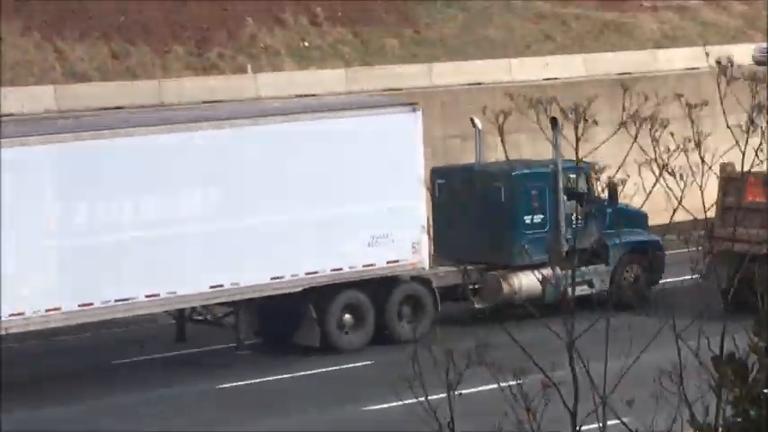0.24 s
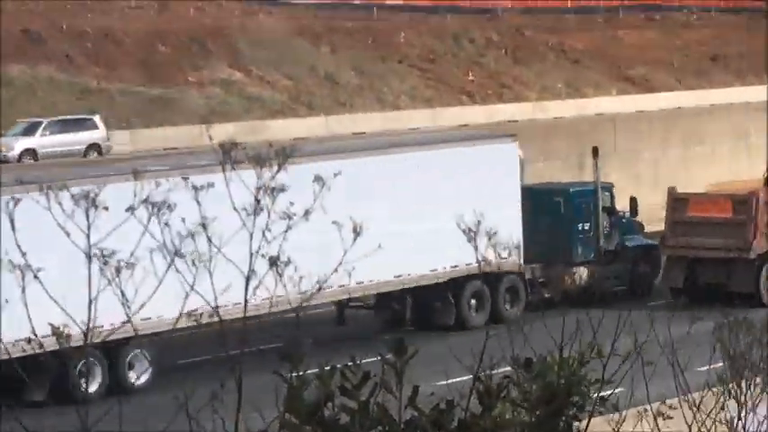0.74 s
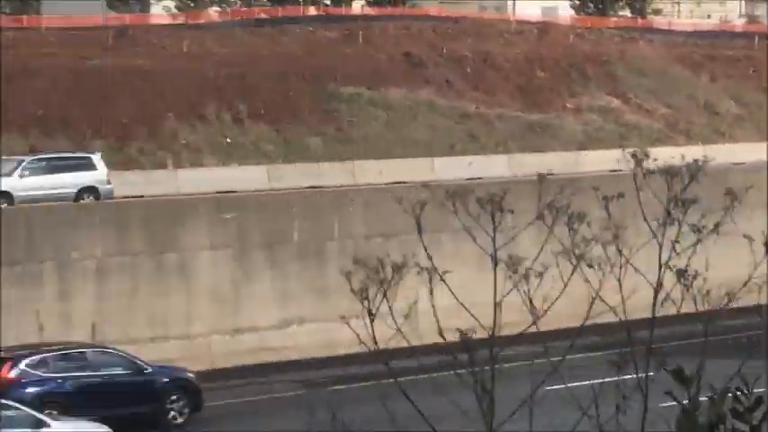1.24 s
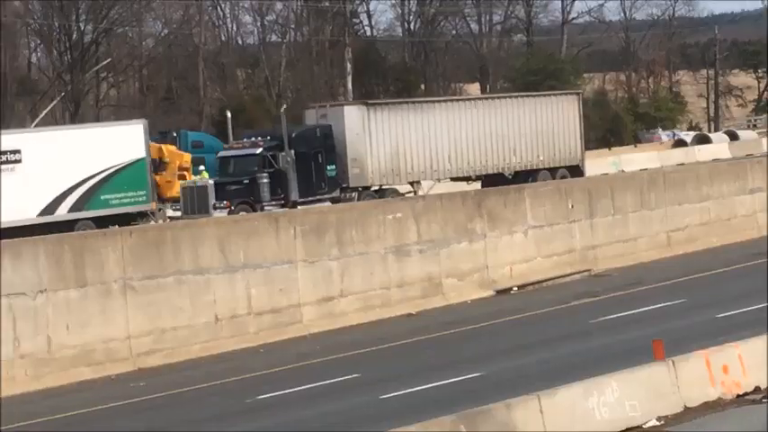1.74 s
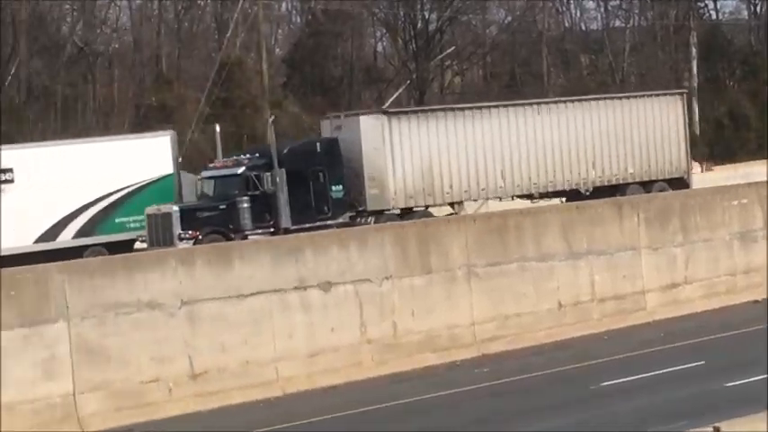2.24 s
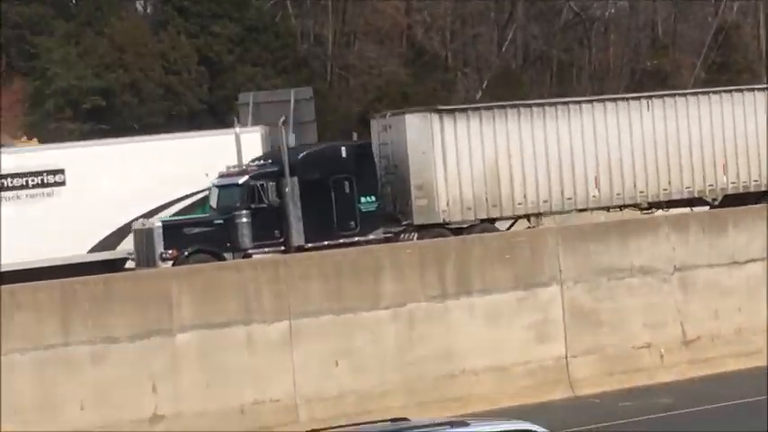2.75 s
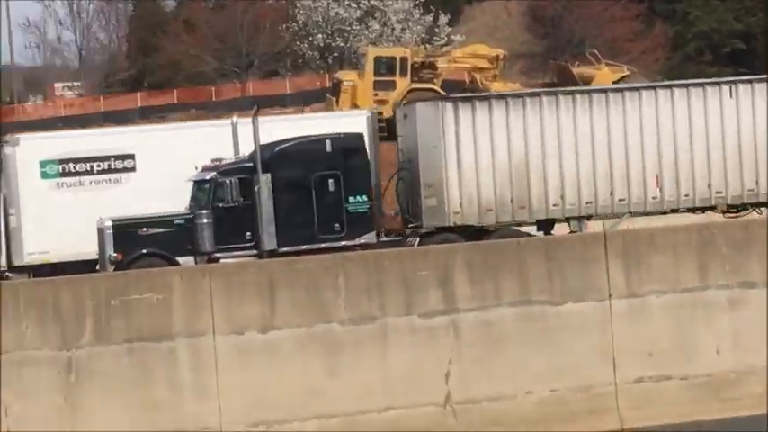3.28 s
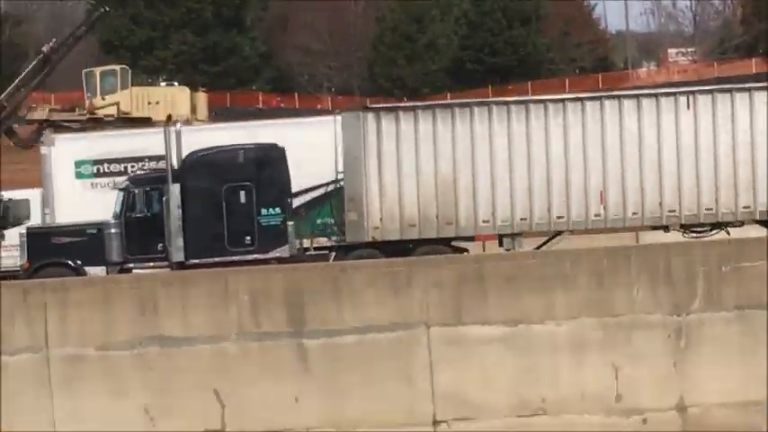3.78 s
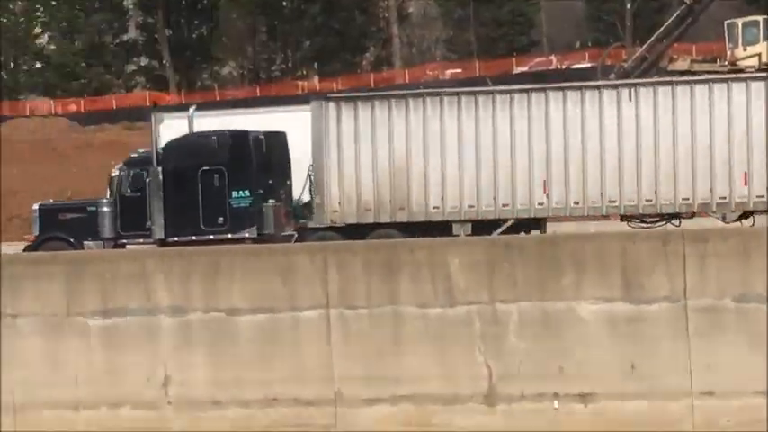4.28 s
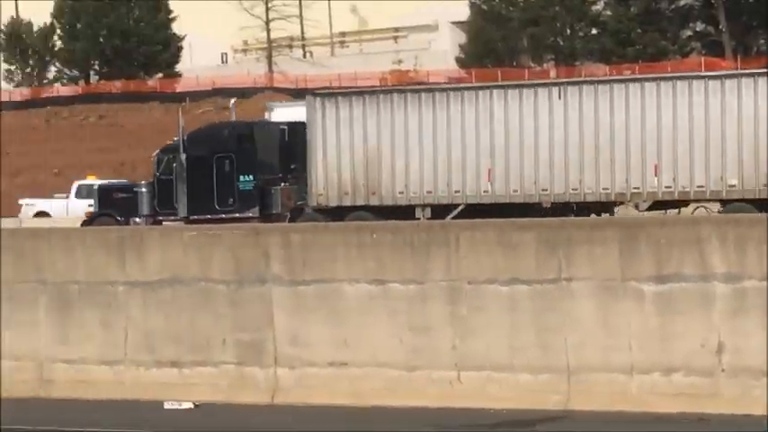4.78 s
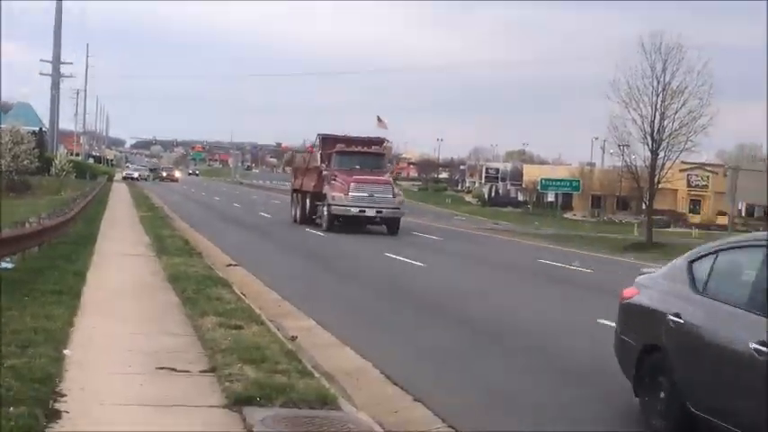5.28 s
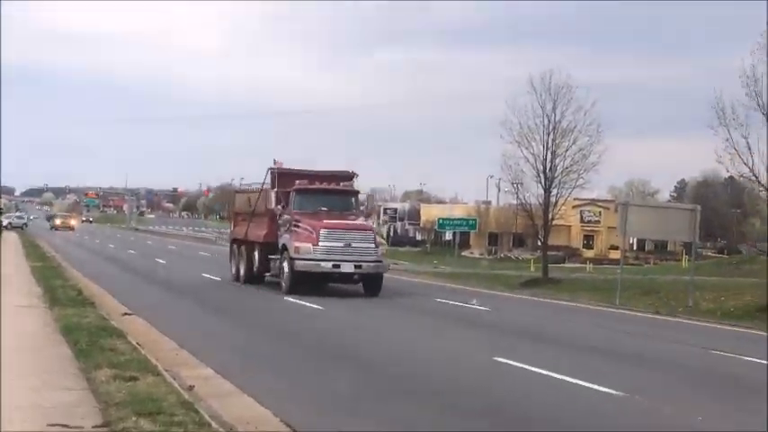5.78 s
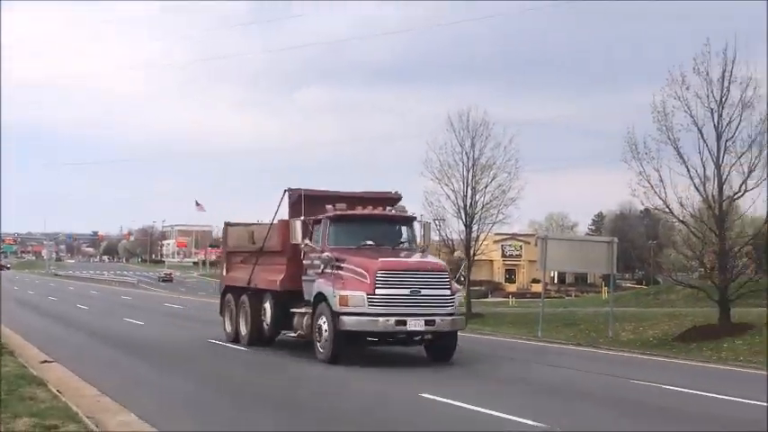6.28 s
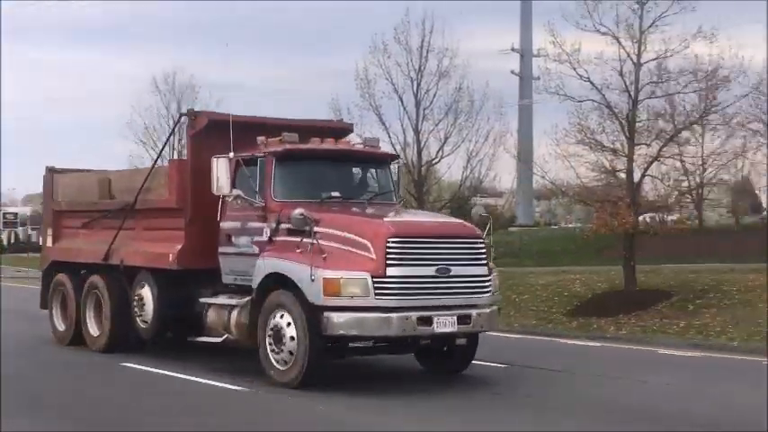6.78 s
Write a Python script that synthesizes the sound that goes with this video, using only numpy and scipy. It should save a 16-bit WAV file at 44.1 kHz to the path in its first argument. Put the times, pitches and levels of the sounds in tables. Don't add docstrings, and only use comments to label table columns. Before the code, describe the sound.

From 0 to 1.3 s a diesel tractor drones steadily, close by, with broad tyre roar and a thin, breathy turbo whistle rising high; a faint tick near 0.9. A tiny silent gap, then at 1.4 a cut to boomier, fuller highway roar. Low axle thumps land, strongest around 1.7 and 2.1, while a distant engine hums. From 2.45 to 3.3 a loose metal panel rattles in rapid, dry crackling bursts, about eleven per second, growing harder. More soft thumps follow, and a car hums in by 4.7. At 4.9 another cut: a dump truck's low growl nears, tyre slaps thud at 5.1-5.7, and tiny high squeaks chatter from 5.75 to 6.2. At 6.65 a loud, brassy, buzzing two-note air horn blasts, dips, and blasts again at 6.78, ducking the road and stopping around 6.9. Treble drops out momentarily throughout.

```python
import sys
import numpy as np
from scipy import signal
from scipy.fft import rfft, irfft, next_fast_len
from scipy.io import wavfile
from scipy.ndimage import uniform_filter1d, map_coordinates

SR = 44100
rng = np.random.default_rng(int(sys.argv[2]) if len(sys.argv) > 2 else 0)


def dump_mix(stems):
    frames = np.atleast_2d(stems).T
    limited = np.clip(frames, -1, 1)
    pcm = np.round(limited * 32767).astype(np.int16)
    wavfile.write(sys.argv[1], SR, pcm)


def undo_db(level):
    steps = np.asarray(level, float) / 20
    return 10 ** steps


N = 310015
T = np.arange(N) / SR

# (start [s], end [s])
PLACES = [
    (0, 1.342),
    (1.385, 4.915),
    (4.915, 7.03),
]
# (frequency [Hz], density [dB/Hz])
COLOURS = [
    [(15, -52), (25, -21), (55, -5), (75, -5.5), (129, -16.5), (331, -18), (369, -12), (510, -17),
     (567, -10.5), (784, -15.5), (1460, -24.5), (2630, -38.5), (4270, -35.5), (9320, -45.5), (15600, -53)],
    [(15, -45), (25, -6.5), (70, 4), (188, -9), (233, -3.5), (274, -8.5), (322, -7.5), (400, -10.5),
     (496, -4), (805, -1), (1810, -14.5), (2240, -20.5), (3180, -23), (7120, -40), (15600, -48.5)],
    [(15, -35), (25, -5), (43, -5.5), (99, -7), (221, -14), (340, -22.5), (445, -29), (523, -29),
     (583, -28.5), (800, -28), (1050, -21.5), (1580, -26.5), (3090, -33), (7930, -37.5), (15600, -42)],
]
# (time [s], firing rate [Hz], first order level [dB])
TRACTOR = [(0, 72.5, -18.5), (.14, 71.5, -30), (.25, 72.7, -17.5), (.59, 71.7, -13.5), (.625, 71.13, -26),
           (.85, 72.25, -27.5), (.95, 71.7, -15), (1.18, 70.2, -17), (1.24, 71.1, -27), (1.34, 70.6, -25)]
FAR_TRUCK = [(1.4, 75.3, -25), (1.73, 74.6, -41), (1.98, 82.7, -30), (2.09, 82.8, -20.5),
             (2.56, 84.1, -37.5), (2.77, 82.5, -27.5), (3.1, 80, -47), (3.79, 83.2, -41), (3.9, 82.3, -59)]
CAR = [(4.3, 62.36, -42), (4.68, 60.4, -24.5), (4.89, 61.6, -21.5), (4.91, 62.3, -40)]
DUMP = [(4.92, 50.53, -27.5), (5.6, 50.18, -28.5), (5.85, 50.26, -23), (6.06, 48.5, -23), (6.52, 48, -20),
        (6.92, 47.1, -18), (7.03, 47.3, -17)]
# (frequency [Hz], gain [dB])
STACK = [(25, -40), (100, -51), (150, 10), (300, 0), (600, -16), (1500, -22), (4000, -34), (9000, -110)]
# (time [s], pitch [Hz], level [dB])
TURBO = [(0, 7300, -48), (.25, 8200, -46), (.45, 8750, -49), (.7, 8950, -51), (1.1, 9150, -49),
         (1.33, 9300, -46), (1.39, 9450, -59), (1.6, 9350, -59), (1.76, 8900, -59), (2.0, 7680, -60),
         (2.17, 7000, -65), (2.3, 6700, -80)]
# (time [s], crack level [dB], push level [dB])
CRACKS = [(2.4697, -24, -23), (2.5413, -26, -15), (2.5487, -29, -13), (2.5553, -24, -20),
          (2.5995, -35, -15), (2.6292, -17, -19), (2.6355, -24, -15), (2.6396, -26, -16),
          (2.6437, -23, -11), (2.6501, -28, -15), (2.7122, -29, -15), (2.7246, -25, -11), (2.731, -22, -19),
          (2.8002, -26, -24), (2.8049, -27, -12), (2.8092, -31, -16), (2.8254, -30, -14),
          (2.9015, -25, -14), (2.9082, -27, -18), (2.9113, -23, -21), (2.937, -34, -17), (2.9794, -29, -14),
          (2.9823, -23, -19), (2.9908, -25, -13), (3.0, -18, -14), (3.0509, -32, -15), (3.0668, -23, -20),
          (3.0723, -23, -12), (3.0804, -22, -10), (3.0886, -13, -10), (3.0928, -20, -14),
          (3.1568, -21, -12), (3.1624, -23, -13), (3.1706, -22, -12), (3.1775, -20, -21),
          (3.1828, -27, -17), (3.1893, -25, -21), (3.2476, -19, -11), (3.253, -24, -11), (3.2616, -21, -13),
          (3.2661, -23, -17), (3.2702, -27, -18)]
# (frequency [Hz], density [dB/Hz])
PANEL = [(1180, -5), (2000, -4), (2400, -11), (2900, -11), (3800, -4.5), (5000, -10), (6500, -16),
         (10300, -33), (15000, -42)]
SHAKE_DB = [-34, -33, -32, -32, -33, -33, -31, -29, -28, -30]
# (time [s], peak [dB], pitch [Hz])
SQUEAKS = [(5.7508, -29, 7170), (5.8017, -31, 7420), (5.8275, -24, 7180), (5.8501, -24, 7070),
           (5.8731, -26, 7250), (5.9269, -29, 7310), (5.9454, -30, 6960), (5.9653, -28, 7070),
           (5.9918, -29, 6610), (6.0102, -27, 6770), (6.0327, -29, 7170), (6.0571, -30, 7040),
           (6.0714, -32, 6590), (6.0931, -23, 6640), (6.1164, -27, 6780), (6.1354, -28, 6920),
           (6.1544, -32, 6980), (6.2113, -31, 6660)]
# (time [s], peak [dB], pitch [Hz], knock re peak [dB])
THUMPS = [(1.42, -15, 76, -12), (1.518, -22, 76, -2), (1.599, -15, 78, -4), (1.67, -22, 76, -6),
          (1.734, -5.5, 74, -7), (2.078, -9, 83, -17), (2.31, -18, 76, -18), (2.5, -18, 70, -12),
          (2.63, -18, 76, -10), (3.33, -19, 70, -15), (3.52, -15, 55, -24), (3.632, -17, 70, -18),
          (3.68, -13, 79.3, -15), (3.76, -20, 83, -4), (4.476, -19, 70, -18), (4.632, -17, 70, -18)]
# (time [s], level [dB], centre [Hz], width [Hz])
TICKS = [
    (.915, -35.5, 6530, 598),
    (2.352, -48, 11870, 4000),
    (3.829, -51, 9050, 5000),
]
# (time [s], peak [dB], pitch [Hz])
FLAT_SPOT = [(5.083, -21, 127), (5.188, -21, 143), (5.299, -20, 137), (5.401, -16, 140), (5.509, -15, 137),
             (5.606, -16, 137), (5.66, -15, 118), (5.709, -17, 102)]
# (early level [dB], late level [dB])
HIGH_BELL = [(-3, -6.5), (-0.5, 3.5), (2.5, -2.5), (-2, -13), (-3, 1), (-2, -6.5), (-23, -3), (-9.5, -14),
             (-13, -13), (-13, -13), (-21, -21), (-20.5, -21), (-24, -17), (-6.5, -9.5), (-17, -19),
             (-15, -22), (-25, -34), (-17, -14), (-27, -24), (-15, -19), (-16, -16), (-17, -20), (-20, -13),
             (-12.5, -13), (-21, -10), (-14, -13), (-11, -14), (-14, -14), (-15, -17), (-15, -11),
             (-35, -30), (-22, -24), (-18, -17), (-33, -22), (-15, -15), (-29, -17), (-21, -20), (-15, -11),
             (-22, -24), (-26, -24)]
LOW_BELL = [(-3.5, -1.5), (-15, -6), (2, 2), (-2, -9), (-12, -4), (-1, 3), (3.5, -1), (-6, -8), (-15, 0.5),
            (-8, -14), (-14, -11), (-22, -11), (-7, -8), (-9, -12), (-23, -13), (-22, -16), (-26, -20),
            (-12, -13), (-10, -1), (-12, -16), (-4, -4.5), (-22, -16), (-22, -18), (-22, -16), (-19, -24),
            (-16, -23), (-11, -12), (-12, -19), (-17, -19), (-25, -32), (-13, -21), (-11, -11), (-12, -9),
            (-28, -9), (-20, -7), (-21, -3), (-14, -6), (-7, -5), (-16, -17), (-11, -8), (-19, -23),
            (-26, -14), (-25, -31), (-25, -22), (-10, -14), (-6, -24), (-21, -17), (-20, -9), (-16, -13),
            (-22, -15), (-11, -11), (-21, -19), (-21, -18), (-25, -22)]
# (frequency [Hz], density [dB/Hz])
BUZZ = [(2240, -30), (4000, -16), (7000, -15), (10300, -11), (11500, -8), (13500, -11), (15600, -13)]
# (full [s], release [s], level [dB])
BLASTS = [
    (6.657, 6.716, 0),
    (6.78, 6.859, -3),
]
# (rest pitch [Hz], sharpening in slack air [0-1])
TRUMPETS = [
    (258.1, .013),
    (192.5, .009),
]
# (time [s], re usual level [dB])
TRACTOR_NEAR = [(0, 1.5), (.25, 1), (.55, -0.5), (.8, 1), (1.1, -4), (1.34, -1)]
FAR_LANES = [(1.4, 2.4), (1.8, 0.45), (2.3, -0.44), (2.65, 1.5), (3.2, 0.71), (3.5, -0.68), (3.8, -1),
             (4.15, -1), (4.4, 0), (4.7, -0.88), (4.9, 1.1)]
CAR_NEAR = [(4.92, -2), (5.1, -0.5), (5.55, -3.5), (5.8, -5), (6.3, -14)]
DUMP_NEAR = [(4.92, -14.5), (5.2, -10), (5.4, -5), (5.75, -4), (6.05, -4.5), (6.6, 0.5)]
HORN_AIR = [(6.62, -34), (6.66, 4), (6.74, 0), (6.8, -10), (6.86, -3), (6.92, -26)]
# (nearness, usual levels of rumble, body, roar, hiss [dB], their follow factors [dB/dB])
ROAD = [
    [(TRACTOR_NEAR, (-21, -26.5, -21.5, -34.5), (0.55, 1.4, 0.3, 0.62))],
    [(FAR_LANES, (-29, -33, -29, -43.5), (1.8, 0.56, 0.58, 0.63))],
    [(CAR_NEAR, (-28, -50, -27, -44.5), (0.43, .9, 0.94, .9)), (DUMP_NEAR, (-20.5, -28.5, -36, -32.5),
     (1, 1.0, 1.4, 1.47)), (HORN_AIR, (-60, -60, -21, -20), (.9, .9, 0.88, 0.68))],
]
# (centre [Hz], width [Hz], depth [0-1])
MIC_DIPS = [(4900, 360, 0.29), (10470, 270, 0.4)]
# (time [s], lowest frequency [Hz], share of lines kept [0-1])
DROPOUTS = [(.835, 2500, .05), (.894, 2500, .03), (1.001, 3000, .06), (1.533, 4000, .03), (2.09, 4000, .06),
            (3.179, 5300, .02), (4.905, 3000, .01), (5.183, 3000, .03), (5.401, 3000, .012),
            (5.448, 4400, .006), (5.567, 3500, .04), (5.634, 2800, .06), (5.801, 2500, .06),
            (5.909, 3000, .05), (6.057, 2500, .07), (6.1, 2500, .06), (6.185, 2000, .02), (6.74, 2800, .11)]


def unit(x):
    return x / np.sqrt(np.mean(x ** 2) + 1e-20)


def along(points, hz):
    f, v = np.transpose(points)
    return np.interp(np.log(hz + 1), np.log(f + 1), v)


def curves(rows):
    s, *cols = np.transpose(rows)
    return [np.interp(T, s, c) for c in cols]


def during(start_s, end_s, fade_s=0.00047):
    return np.clip(np.minimum(T - start_s, end_s - T) / fade_s, 0, 1)


def wobble(rate_hz):
    return map_coordinates(rng.standard_normal(int(N * rate_hz / SR) + 4), [T * rate_hz])


def filtered(x, response):
    m = next_fast_len(len(x) + 8192)
    return irfft(rfft(x, m) * response(np.fft.rfftfreq(m, 1 / SR)), m)[:len(x)]


def above(hz, edge_hz):
    return 1 / (1 + (edge_hz / (hz + 1)) ** 6)


def ring(start_s, db, hz, t60_s, attack_s):
    t = np.clip(T - start_s, 0, None)
    return undo_db(db - 60 * t / t60_s) * np.sin(2 * np.pi * hz * t) * (1 - np.exp(-t / attack_s))


def power_sum(levels_db):
    return np.sqrt(sum(undo_db(db) ** 2 for db in levels_db))


def rush(spectrum, patchy_db):
    z = signal.stft(rng.standard_normal(N), nperseg=512)[2]
    field = uniform_filter1d(rng.standard_normal(z.shape), size=5, axis=0)
    field = uniform_filter1d(field, size=10, axis=1)
    noise = signal.istft(z * undo_db(patchy_db * unit(field)), nperseg=512)[1][:N]
    return filtered(noise, lambda hz: undo_db(along(spectrum, hz)))


def traffic():
    out = np.zeros(N)
    for place, sources, colour in zip(PLACES, ROAD, COLOURS):
        noise = rush(colour, patchy_db=1.38)
        over = [noise]
        for edge_hz in (310, 980, 2800):
            over.append(filtered(noise, lambda hz: above(hz, edge_hz)))
        over.append(0)
        for k, swell_db in enumerate([1.0, 0.55, 0.2, 0.13]):
            gain = power_sum(usual[k] + follows[k] * curves(near)[0] for near, usual, follows in sources)
            band = unit(over[k] - over[k + 1])
            out += during(*place) * gain * undo_db(swell_db * wobble(rate_hz=18)) * band
    return out


def engine(rows, second_span_db, bark_db, uneven_db=3):
    hz, first_db = curves(rows)
    start_s, end_s = rows[0][0], rows[-1][0]
    second_db = np.interp(T, [start_s, end_s], second_span_db) + 1.5 * wobble(rate_hz=8)
    turns = np.cumsum(hz * (1 + 0.00616 * wobble(rate_hz=9))) / SR
    drone = undo_db(first_db) * np.sin(2 * np.pi * turns) + undo_db(second_db) * np.sin(4 * np.pi * turns + 1)
    firing = np.flatnonzero(np.diff(np.floor(turns)))
    cylinder_db = rng.normal(0, uneven_db, size=6)[np.arange(len(firing)) % 6]
    pulses = np.zeros(N)
    pulses[firing] = undo_db(cylinder_db + uneven_db * rng.standard_normal(len(firing)))
    bark = unit(filtered(pulses, lambda f: undo_db(along(STACK, f)) * np.exp(-1j * np.sqrt(f / 60))))
    rasp = filtered(rng.standard_normal(N), lambda f: above(f, edge_hz=340) * (1 - above(f, edge_hz=1500)))
    bark += 2 * unit(rasp) * np.exp(-5 * (turns % 1))
    smooth_db = uniform_filter1d(first_db, size=SR // 4)
    return during(start_s, end_s, fade_s=0.00081) * (np.sqrt(2) * drone + undo_db(smooth_db + bark_db) * bark)


def engines():
    near = engine(TRACTOR, (-33, -39), bark_db=-14.5) + engine(DUMP, (-42, -17), bark_db=-10.5, uneven_db=0.0)
    far = engine(FAR_TRUCK, (-41, -50), bark_db=-33.0) + engine(CAR, (-45, -30), bark_db=-11.5)
    return near + far


def whistle(rows, width_hz):
    hz, db = curves(rows)
    phase = 2 * np.pi * np.cumsum(hz) / SR
    blurred = wobble(width_hz) * np.sin(phase) + wobble(width_hz) * np.cos(phase)
    return during(rows[0][0], rows[-1][0]) * undo_db(db + 1.4 * wobble(rate_hz=43)) * blurred


def glide(start_s, end_s, first_hz, last_hz, db, width_hz):
    s = np.array([start_s, start_s + .08, end_s - .08, end_s])
    hz = np.interp(s, [start_s, end_s], [first_hz, last_hz])
    return whistle(list(zip(s, hz, db - 18 * np.array([1, 0, 0, 1]))), width_hz)


def turbos():
    return whistle(TURBO, width_hz=380) + glide(.36, 1.07, 9200, 10250, db=-50, width_hz=500)


def steady_tones():
    out = during(*PLACES[0]) * glide(.45, 1.43, 578, 556, db=-30, width_hz=25)
    out += glide(2.38, 2.63, 275, 271, db=-32, width_hz=15)
    out += glide(2.8, 3.0, 288, 290, db=-40, width_hz=15)
    out += glide(5.1, 5.75, 147, 138, db=-35, width_hz=20)
    out += glide(5.7, 6.21, 7350, 6700, db=-49, width_hz=600)
    return out + glide(6.22, 6.66, 782, 775, db=-41, width_hz=12)


def ticks():
    out = np.zeros(N)
    for s, db, hz, width_hz in TICKS:
        noise = filtered(rng.standard_normal(N), lambda f: np.exp(-((f - hz) / width_hz) ** 2))
        out += undo_db(db) * during(s - .012, s + 0.013, fade_s=0.0062) * unit(noise)
    return out


def thumps():
    out = np.zeros(N)
    for s, db, hz, knock_db in THUMPS:
        out += ring(s, db + 3.5, hz, t60_s=.092, attack_s=0.0053)
        out += ring(s, db + knock_db + 9, 2.59 * hz, t60_s=.046, attack_s=0.0025)
        out += ring(s, db + knock_db - 1.5, 5 * hz, t60_s=.046 * 0.67, attack_s=0.0013)
    return out


def rattle():
    first_s, turn_s, length_s, t60_s = 2.449, .0886, .022, .12
    grains = rng.standard_normal(N) * undo_db(3 * wobble(rate_hz=500))
    high = unit(filtered(grains, lambda hz: undo_db(along(PANEL, hz))))
    low = unit(filtered(grains, lambda hz: above(hz, edge_hz=190) * (1 - above(hz, edge_hz=1500))))
    out = np.zeros(N)
    for turn, db in enumerate(SHAKE_DB):
        s = first_s + turn_s * turn
        decay = undo_db(-60 * np.clip(T - s - length_s, 0, None) / t60_s)
        out += during(s, T[-1], fade_s=.003) * decay * (undo_db(db) * high + undo_db(-33) * low)
    for s, db, push_db in CRACKS:
        hz = 3450 * (1 + .15 * rng.uniform(-0.81, 1))
        out += ring(s, db + 5, hz, t60_s=.004, attack_s=.0001)
        out += ring(s, db, 1.45 * hz, t60_s=.003, attack_s=.0001)
        out += ring(s, db - 7, 2.4 * hz, t60_s=.0025, attack_s=.00005)
        out -= ring(s, push_db + 2.5, 1150, t60_s=.005, attack_s=.00008)
    return out


def flat_spot():
    return sum(ring(s, db + 3.5, hz, t60_s=0.073, attack_s=.006) for s, db, hz in FLAT_SPOT)


def squeaks():
    out = np.zeros(N)
    for s, db, hz in SQUEAKS:
        out += ring(s, db + 1, 1.01 * hz, t60_s=0.03, attack_s=0.002)
        out += ring(s + 0.0012, db - 1, rng.uniform(.93, 1.04) * hz, t60_s=0.025, attack_s=0.002)
    return out * (1 + .6 * wobble(rate_hz=600))


def valve(db, lead_s, rise_db_per_s, sag_db_per_s, fall_db_per_s):
    pulls = []
    for full_s, release_s, pull_db in BLASTS:
        rise = rise_db_per_s * np.clip(T - full_s + lead_s, None, 0)
        sag = sag_db_per_s * np.clip(T - full_s, 0, None)
        fall = fall_db_per_s * np.clip(T - release_s, 0, None)
        pulls.append(db + pull_db + rise - sag - fall)
    return np.max(pulls, axis=0)


def horn():
    start_s, end_s, full_buzz_db = 6.62, 6.935, -19.5
    high_db = valve(-9, lead_s=.022, rise_db_per_s=1800, sag_db_per_s=15, fall_db_per_s=420)
    low_db = valve(-12.5, lead_s=.008, rise_db_per_s=900, sag_db_per_s=35, fall_db_per_s=520)
    buzz_db = valve(full_buzz_db, lead_s=.007, rise_db_per_s=600, sag_db_per_s=60, fall_db_per_s=800)
    between = (T > BLASTS[0][1]) & (T < BLASTS[1][0])
    high_db = np.where(between, np.maximum(high_db, -8.5), high_db)
    out, slaps = np.zeros(N), np.zeros(N)
    on = slice(int(start_s * SR), N)
    late = np.clip((T[on] - 6.715) / 0.081, 0, 1)
    slack = uniform_filter1d(np.clip((full_buzz_db - buzz_db) / 20, 0, 1), size=int(.03 * SR))
    slack = np.roll(slack, int(.01 * SR))
    dulling_db = np.clip(buzz_db[on] - full_buzz_db + 4, -40, 0)
    voices = zip(TRUMPETS, (high_db, low_db), (HIGH_BELL, LOW_BELL), (0, -3))
    for (rest_hz, sharp), db, bell, slap_db in voices:
        hz = rest_hz * (1 + sharp * slack)
        phase = 2 * np.pi * np.cumsum(hz * (1 + .0005 * wobble(rate_hz=40)))[on] / SR
        for k, (early_db, late_db) in enumerate(bell, start=1):
            bell_db = early_db + late * (late_db - early_db)
            level_db = db[on] - 5.5 + 0.025 * k * dulling_db + bell_db + 2.6 * wobble(rate_hz=55)[on]
            out[on] += undo_db(level_db) * np.sin(k * phase + rng.uniform(0, 2 * np.pi))
        for k in range(len(bell) + 1, int(15700 / hz.max())):
            early_db, late_db = rng.normal(0, 3.4, size=2)
            level_db = slap_db + early_db + late * (late_db - early_db)
            slaps[on] += undo_db(level_db) * np.sin(k * phase + rng.uniform(0, 2 * np.pi))
    air = undo_db(-14) * np.std(slaps[on]) * rng.standard_normal(N)
    buzz = filtered(slaps + air, lambda f: undo_db(along(BUZZ, f)))
    return during(start_s, end_s) * (out + undo_db(buzz_db) * buzz / np.std(buzz[on]))


def scene():
    road = traffic() + engines() + turbos() + steady_tones()
    road += ticks() + thumps() + rattle() + flat_spot() + squeaks()
    duck = undo_db(-8.5 * np.clip((T - 6.63) / .07, 0, 1))
    return (duck * road + horn())[None]


def thin_treble(x):
    hz = np.fft.rfftfreq(2048, 1 / SR)
    for s, low_hz, kept in DROPOUTS:
        frame = slice(round(s * SR) - 1024, round(s * SR) + 1024)
        lines = rfft(x[frame])
        half_s = .022 if s == 5.448 else .011
        strength = np.abs(lines) * hz ** .25
        treble = hz > low_hz
        weak = strength < np.quantile(strength[treble], 1 - kept)
        weak_loss = 1 if kept < .015 else .91
        lost = treble * np.where(weak, weak_loss, -.3)
        x[frame] -= during(s - half_s, s + half_s, fade_s=.007)[frame] * irfft(lines * lost)
    return x


def band_limit(x):
    return signal.sosfilt(signal.butter(12, 15700, fs=SR, output="sos"), x)


def record(dry):
    x = filtered(dry[0], lambda hz: above(hz, edge_hz=32.4) ** 2)
    x = filtered(x, lambda hz: 1 - sum(depth * np.exp(-((hz - c) / w) ** 2) for c, w, depth in MIC_DIPS))
    x *= 1 - during(PLACES[0][1], PLACES[1][0])
    x = x / (1 + np.abs(x) ** 14) ** (1 / 14)
    mix = thin_treble(x)[None]
    return band_limit(mix)


dry = scene()
out = record(dry)
dump_mix(out)
```